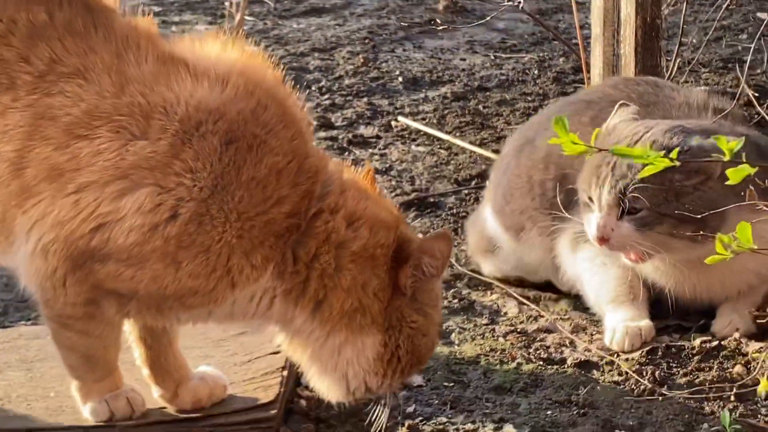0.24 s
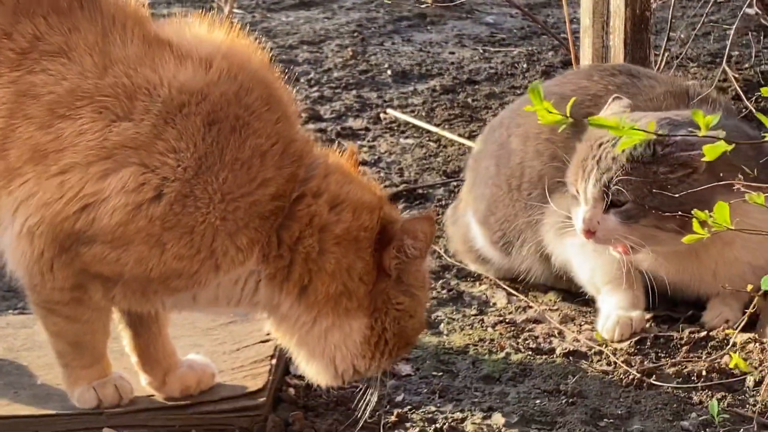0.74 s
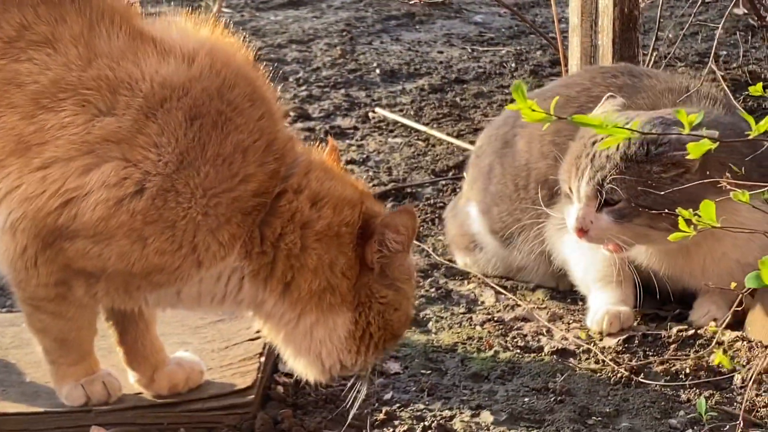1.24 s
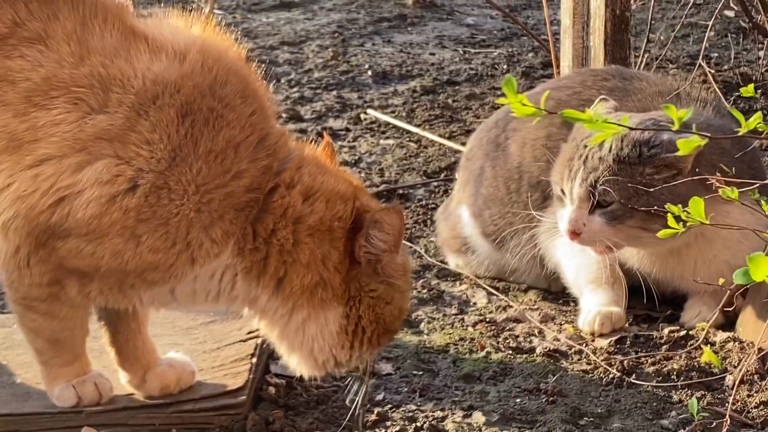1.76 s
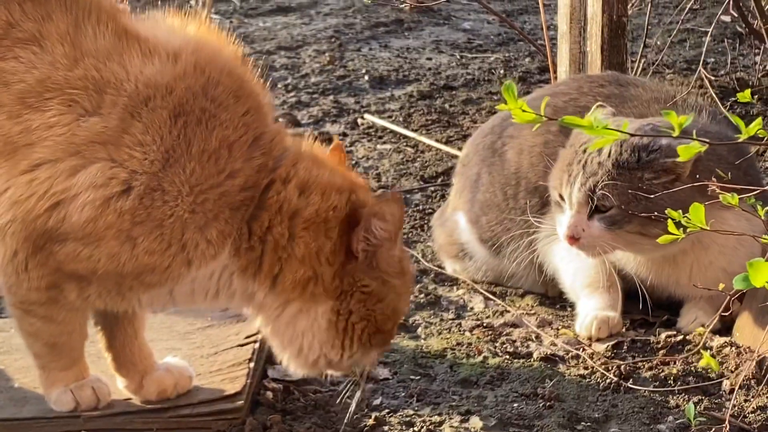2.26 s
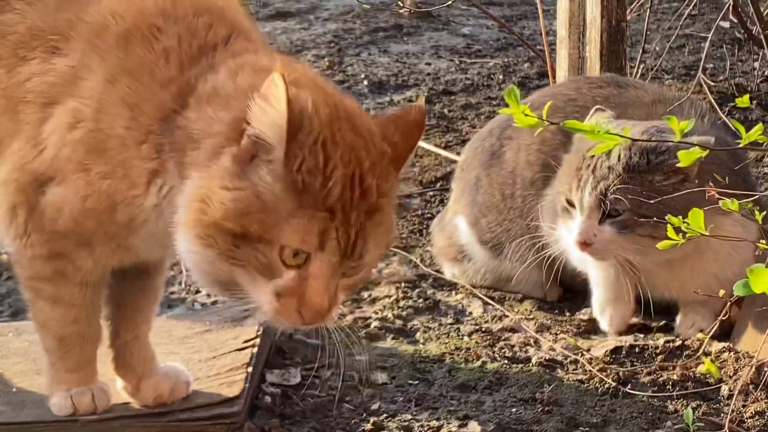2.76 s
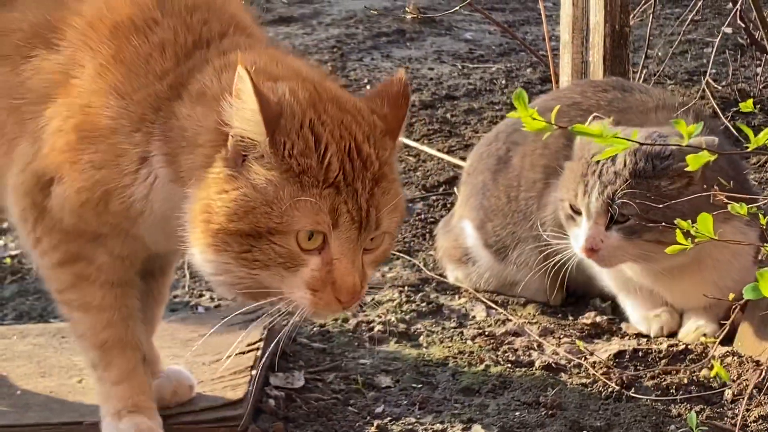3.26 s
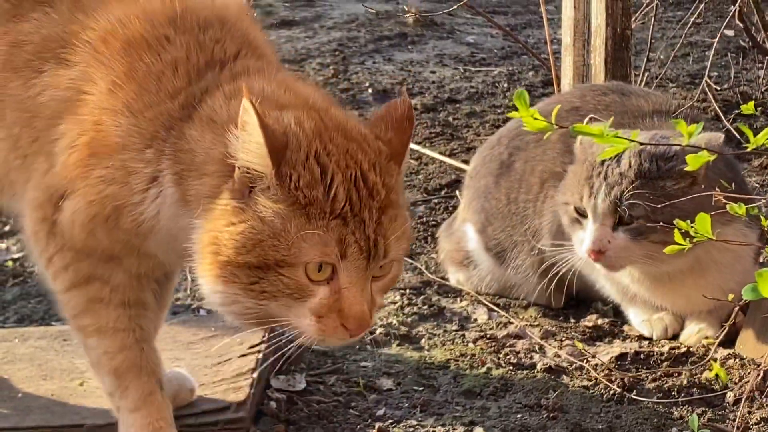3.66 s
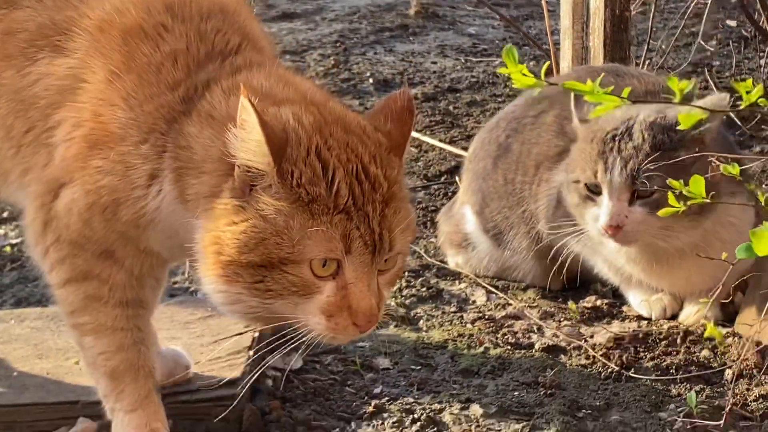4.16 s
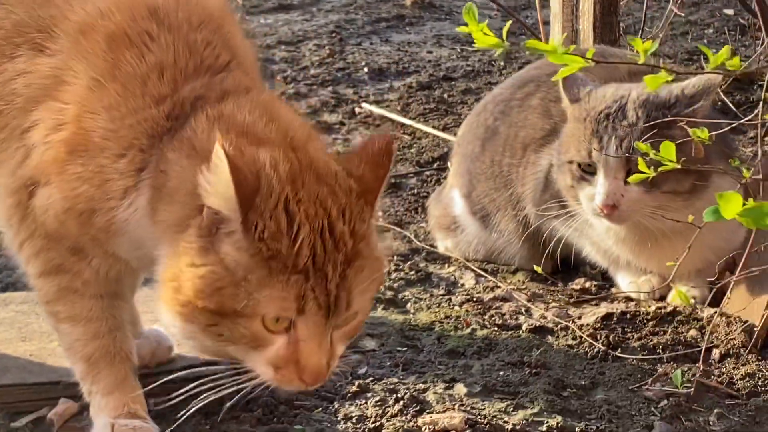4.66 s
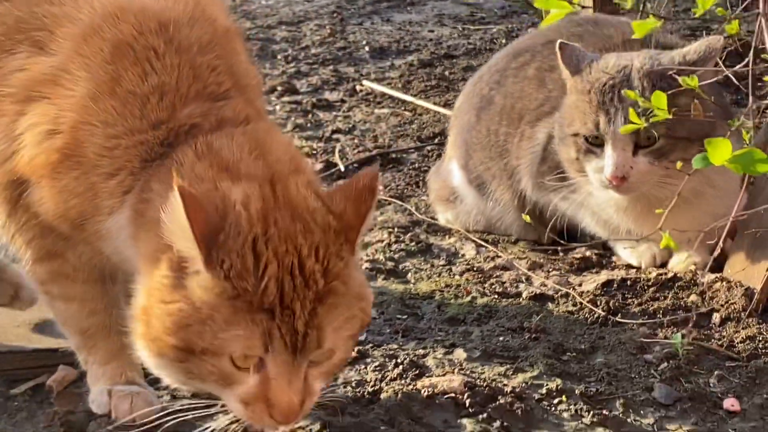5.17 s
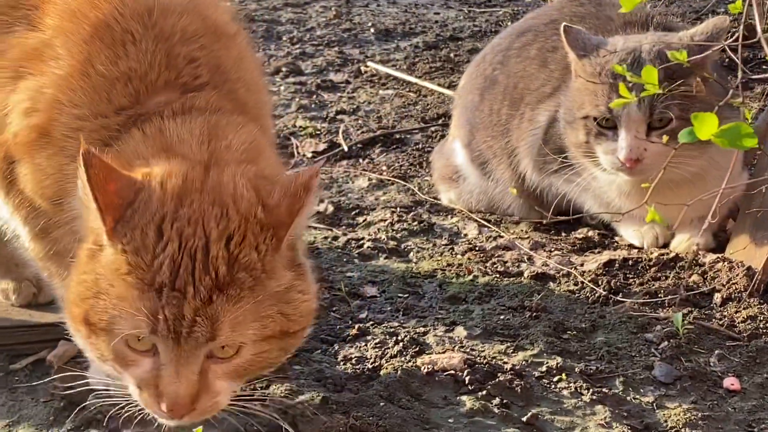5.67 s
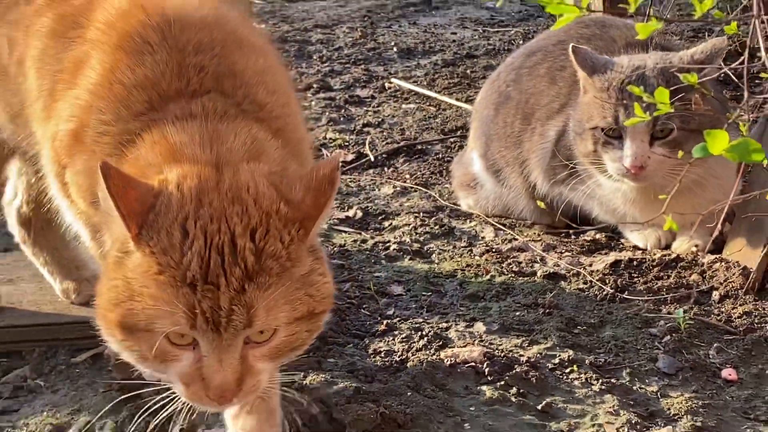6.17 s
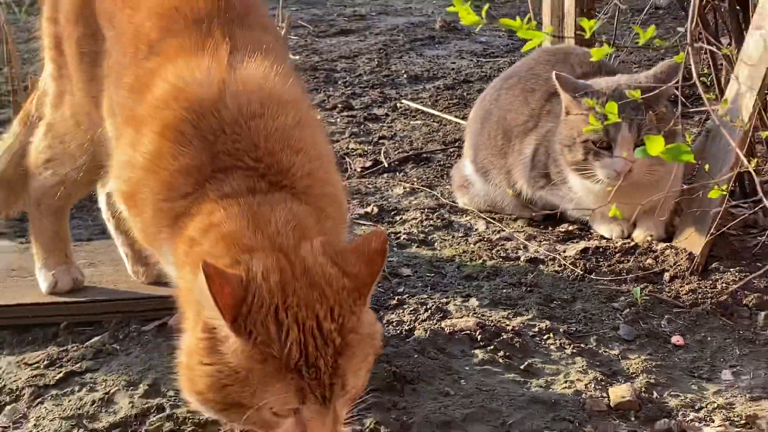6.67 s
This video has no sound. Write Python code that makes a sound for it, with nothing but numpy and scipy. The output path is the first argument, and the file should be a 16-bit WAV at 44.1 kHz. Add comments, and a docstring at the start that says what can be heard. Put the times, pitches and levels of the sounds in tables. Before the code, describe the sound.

Outdoors, a tense, drawn-out cat yowl sinks into a rattling growl, leaving a quiet garden with distant whistling birds and small twig ticks.

```python
"""From the start, filtered noise gives light wind, a murmur and dry leaves, under two faint tones.
A cat yowls close by: harmonics of its vocal folds, raspy with turbulence while the mouth is open, then clean.
The voice cracks near 2 s and slides down two octaves into a growl; far birds, gliding sines, call from 1.2 s.
A soft thump of low noise falls at 2.9 s; as the yowl ends, noise bursts tick like a twig under a paw, and
birds whistle on with long echoes. Last, soft swells of low noise are the cat shifting its weight."""
import sys
import numpy as np
from scipy import signal
from scipy.fft import rfft, irfft, next_fast_len
from scipy.io import wavfile
from scipy.ndimage import map_coordinates

SR = 44100
rng = np.random.default_rng(int(sys.argv[2]) if len(sys.argv) > 2 else 0)


def master_out(mix):
    """Clip the mix to full scale and print it as 16-bit PCM to the path in sys.argv[1]."""
    frames = np.transpose(np.atleast_2d(mix))
    ceiling = np.clip(frames, -1, 1)
    pcm = np.round(ceiling * 32767).astype(np.int16)
    wavfile.write(sys.argv[1], SR, pcm)


N = 304992
TIME = np.arange(N) / SR  # s

# resonances of the throat for the upper partials and the leaking air: (frequency [Hz], level [dB])
THROAT = [(600, 9), (1000, 28.5), (1450, 7.5), (2200, 21), (2500, 0.5), (2650, 3), (2850, -8), (3150, -3),
          (3450, -10.5), (4300, -6), (5600, -1.5), (7000, 1.5), (8000, -3), (9000, -24), (12500, -5.5),
          (15000, -19.5)]
SLACK_DB_PER_OCTAVE = -17.5  # fading of the upper partials as the folds slacken; the rasp floor fades half as fast


def amp(db):
    """A level in decibels is twenty times the logarithm of the gain returned."""
    return 10 ** (np.asarray(db) / 20)


def unit(x):
    """Normalise the mean power to 1, so that a later gain sets the rms level."""
    return x / np.sqrt(np.mean(x ** 2) + 1e-20)


def along(points, hz):
    """Interpolate (frequency, value) points on a logarithmic axis, on which equal steps are equal intervals."""
    point_hz, values = np.transpose(points)
    return np.interp(np.log(hz + 1), np.log(point_hz + 1), values)


def curve(points):
    """Interpolate (time, value) points linearly to one value per sample."""
    return np.interp(TIME, *np.transpose(points))


def bell(x, centre, half_width):
    """Gaussian weighting, falling to 1/e at the half width."""
    return np.exp(-((x - centre) / half_width) ** 2)


def resonance(hz, centre_hz, half_width_hz):
    """Lorentzian peak of height 1, the shape of a damped resonance, falling to 1/2 at the half width."""
    return 1 / (1 + ((hz - centre_hz) / half_width_hz) ** 2)


def swells(rows):
    """Superpose Gaussian gain envelopes given as (time [s], 1/e half length [s], level [dB])."""
    return sum(amp(db) * bell(TIME, s, length) for s, length, db in rows)


def wobble(rate):
    """Band-limited random modulation: a spline through random knots, rate knots a second."""
    knots = rng.standard_normal(int(N * rate / SR) + 4)
    return map_coordinates(knots, [TIME * rate])


def filtered(x, response):
    """Linear filtering: multiply the spectrum by a response of frequency."""
    m = next_fast_len(N + SR // 2)
    return irfft(rfft(x, m) * response(np.fft.rfftfreq(m, 1 / SR)), m)[..., :N]


def shaped(x, spectrum):
    """Colour a signal with a spectrum by linear filtering, then normalise it to rms 1."""
    return unit(filtered(x, lambda hz: amp(along(spectrum, hz))))


def rush(spectrum):
    """A diffuse field as mid and side noise of one colour; rms 1."""
    # width of the field, near mono in the bass: (frequency [Hz], side level relative to mid [dB])
    width = [(60, -20), (200, -12), (500, -3.5), (1500, 0.5), (2200, -10.5), (3500, -19)]

    def mid_side_gain(hz):
        """The coherence of left and right follows from the ratio of side to mid."""
        mid_db = along(spectrum, hz)
        return amp([mid_db, mid_db + along(width, hz)])

    mid, side = filtered(rng.standard_normal((2, N)), mid_side_gain)
    return unit(np.array([mid + side, mid - side]))


def placed(x, left_db):
    """Place a mono source by interaural level difference, louder on the left by left_db."""
    return np.array([x * amp(left_db / 2), x * amp(-left_db / 2)])


def garden(x, t60):
    """Diffuse reverberation from ground, fence and shrubs: exponentially decaying noise, different at each ear."""
    t = np.arange(SR // 2) / SR
    decay = amp(-60 * t / t60) * (t > .004)  # the echoes start after 4 ms
    tail = rng.standard_normal((2, len(t))) * decay
    return signal.fftconvolve(x[None], tail / np.linalg.norm(tail[0]), axes=1)[:, :N]


def yowl():
    """Source and filter: vocal folds and turbulence excite mouth and throat, under one pitch, pressure and jaw."""
    # the yowl sags gently, cracks and slides down: (time [s], pitch before jitter [Hz])
    pitch_points = [(0, 634.7), (.3, 634.8), (.56, 624), (.98, 612.3), (1.17, 599.1), (1.31, 614.6),
                    (1.45, 604.3), (1.54, 607.8), (1.675, 571.7), (1.7, 589), (1.88, 576.3), (1.968, 522.7),
                    (1.988, 566.4), (2.075, 537.9), (2.11, 517), (2.22, 488), (2.355, 382.8),
                    (2.425, 386.2), (2.457, 361.7), (2.49, 295.6), (2.546, 246.7), (2.62, 222.1),
                    (2.735, 180.4), (2.9, 150.7), (3.15, 138), (3.27, 117.2)]
    # effort, which sets the strength of overtones and rasp: (time [s], level [dB])
    press_points = [(0, -1), (.35, 1.5), (.77, 0.5), (.84, -1.5), (1.0, 1.5), (1.17, 1), (1.45, 0.5),
                    (1.62, 2.5), (1.73, -0.5), (1.97, 1), (2.0, -5.5), (2.08, -12), (2.11, -8.5),
                    (2.45, -18.5), (3.2, -20), (3.3, -8)]
    # jaw: (time [s], opening [0-1])
    mouth_points = [(0, 0.95), (.56, 0.94), (.8, 0.78), (1.14, 0.76), (1.3, .25), (1.46, .42), (1.6, 0),
                    (1.9, 0.1)]
    # centre of the throat's high resonance: (time [s], frequency [Hz])
    ring_points = [(0, 5650), (1.0, 5720), (1.45, 5700), (1.62, 6260), (1.85, 6380), (1.94, 5400),
                   (1.99, 4950), (2.11, 4630), (2.3, 4360)]
    # the folds fall out of step for a moment: (time [s], 1/e half length [s], unevenness [dB])
    stumbles = [(2.382, .015, -15), (2.448, .013, -9), (2.91, .025, -9)]
    # air hissing past the teeth once the voice has cracked: (frequency [Hz], level [dB per Hz])
    airflow_spectrum = [(1000, -22.5), (4500, -4), (5600, -7), (6500, -1), (8300, -4), (9500, -20),
                        (13000, -8.5), (15000, -30.5)]
    crack_s, end_s, release_s = 1.982, 3.285, 0.068  # the folds change register at the crack
    slack_hz = 440  # below this pitch the folds slacken
    upper_shut_db, upper_open_db = -57, 3  # upper partials with the mouth shut, and their gain when it opens
    crack_thin_db, airflow_db = -0.5, -75

    steady_pitch, press_db = curve(pitch_points), curve(press_points)
    mouth, ring_hz = np.clip(curve(mouth_points), 0, 1), curve(ring_points)
    cracked = np.clip((TIME - crack_s) / 0.0092, 0, 1)
    slack = np.maximum(np.log2(slack_hz / steady_pitch), 0)  # octaves
    stumble = swells(stumbles)
    pitch = jittered(steady_pitch, mouth, slack, stumble)
    phase = 2 * np.pi * np.cumsum(pitch) / SR
    puffs = rng.standard_normal(N) * (1 + .7 * np.cos(phase))  # air leaves in puffs, one a cycle

    strain = 0.048 + 0.22 * mouth  # a strained voice flutters in strength
    low = low_partials(steady_pitch, phase, press_db, mouth, cracked, slack, strain)
    upper_db = upper_shut_db + upper_open_db * mouth + press_db
    upper_db = upper_db + crack_thin_db * cracked + SLACK_DB_PER_OCTAVE * slack
    upper = upper_partials(pitch, phase, mouth, cracked, ring_hz)
    upper = upper * amp(upper_db + 0.62 * wobble(45) + 0.66 * strain * wobble(260))
    airflow = amp(airflow_db) * cracked * shaped(puffs, airflow_spectrum)

    grip = 1 - 0.83 * bell(TIME, crack_s, .005)  # the folds lose their grip at the crack
    grip = grip * np.clip((end_s - TIME) / release_s, 0, 1)
    grip = grip * amp(3.5 * stumble * wobble(180))
    dark = grip * (np.sqrt(2) * (low[0] + low[1]) + growl(pitch, phase, puffs))
    bright = grip * (np.sqrt(2) * (low[2] + low[3]) + rasp(puffs, press_db, mouth, slack))
    top = grip * (np.sqrt(2) * upper + leak(puffs, pitch, mouth, upper_db) + airflow)
    lean_db = np.interp(pitch, [150, 600], [2.4, 4.3])  # low notes reach both sides more equally
    direct = placed(dark, lean_db) + placed(bright, left_db=1.4) + top
    return direct + amp(-14.5) * garden(dark + bright, t60=0.17)


def jittered(pitch, mouth, slack, stumble):
    """Frequency jitter: irregular fold vibration spreads the pitch, most when slack, open or out of step."""
    least, by_opening, by_slack, by_stumble = 0.0017, 0.0011, 0.005, .05  # shares of the pitch
    jitter = least + by_opening * mouth + by_slack * slack ** 2 + by_stumble * stumble
    return pitch * (1 + jitter * (wobble(70) + 1.1 * wobble(400) + .5 * wobble(20)))


def low_partials(pitch, phase, press_db, mouth, cracked, slack, strain):
    """Harmonic series: partials 1 to 4 are whole multiples of one phase, weighted by chest and mouth."""
    # the fundamental comes through the chest: (pitch [Hz], level [dB])
    fundamental = [(120, -50), (138, -42.5), (160, -35), (200, -35.5), (280, -41), (340, -38.5),
                   (440, -36.5), (550, -44.5), (630, -47.5)]
    # resonances of the mouth wide open, for partials 2 to 4: (frequency [Hz], level [dB])
    open_mouth = [(1000, -36), (1260, -37), (1700, -16), (1900, -13), (2100, -16), (2500, -11.5)]
    # resonances of the mouth nearly shut, likewise: (frequency [Hz], level [dB])
    shut_mouth = [(300, -40), (420, -26.5), (600, -23.5), (780, -24.5), (980, -22.5), (1130, -21.5),
                  (1250, -26.5), (1420, -50.5), (1730, -31.5), (2120, -18), (2500, -23)]
    overtone_db_per_octave, crack_third_db = -18.5, -3.5

    levels_db = [along(fundamental, pitch)]
    for k in range(2, 5):
        mouth_db = mouth * along(open_mouth, k * pitch) + (1 - mouth) * along(shut_mouth, k * pitch)
        levels_db.append(press_db + mouth_db + overtone_db_per_octave * np.log2(k / 2))
    # the new register has a weak third partial, until the folds slacken
    levels_db[2] = levels_db[2] + crack_third_db * cracked * np.clip(1 - slack, 0, 1)
    flutter = wobble(90)
    return [amp(db + 0.08 * k * strain * flutter + 0.51 * wobble(11)) * np.sin(k * phase)
            for k, db in enumerate(levels_db, 1)]


def upper_partials(pitch, phase, mouth, cracked, ring_hz):
    """Formant filtering: resonances of the throat weight each of the partials 5 to 29 as it passes through."""
    shut = np.clip((640 - pitch) / 100, 0, 1)  # the jaw closes as the pitch falls
    half_closed = np.clip((.75 - mouth) / 0.065, 0, 1)

    def throat_db(hz):
        """Resonances add level and absorption removes it, at each frequency."""
        db = along(THROAT, hz)
        # after the crack the high resonance stands out
        db = db + (7.5 + 13 * cracked) * resonance(hz, ring_hz, 220)
        # closing the jaw damps the upper middle
        db = db - 19.5 * shut * bell(hz, 4020, 390)
        # after the crack a second resonance above it, and the very top, stand out too
        db = db + 8.5 * cracked * resonance(hz, 1.58 * ring_hz, 400)
        db = db + 10 * cracked * np.clip((hz - 8000) / 2500, 0, 1)
        # the half-closed mouth swallows a narrow band
        db = db - 20.5 * half_closed * bell(hz, 3110, 150)
        # after the crack the partials between the two high resonances fade
        return db - 6.5 * cracked * bell(hz, 1.22 * ring_hz, 600)

    upper = np.zeros(N)
    for k in range(5, 30):
        partial_db = throat_db(k * pitch) - 0.98 * (k - 5) + 2.8 * wobble(13)  # higher partials are weaker
        # phases scattered by 0.7 rad line up loosely into pulses
        upper += amp(partial_db) * np.sin(k * phase + rng.normal(0, .7))
    return upper


def rasp(puffs, press_db, mouth, slack):
    """Turbulence modulated at the pitch excites the mouth's resonances, and grows as a power of its opening."""
    # two strong mouth resonances, a broad high one and a thin top: (frequency [Hz], level [dB per Hz])
    spectrum = [(500, -35.5), (1050, -22), (1450, -19), (1650, -3.5), (1800, -3), (2060, -13), (2350, -2.5),
                (2680, -7.5), (2920, -23), (3250, -37), (4100, -30), (5700, -19), (7400, -27.5),
                (9300, -56.5), (12500, -37.5), (13800, -61)]
    # the rasp catches again as the jaw closes: (time [s], 1/e half length [s], level [dB])
    catches = [(1.315, .012, -48), (1.375, .01, -53), (1.425, .01, -54), (1.48, .015, -57),
               (1.95, .02, -63)]
    open_db, shut_db, opening_power = -40.5, -71.5, 1.8
    clear_s, clear_length_s, clear_db = 1.2, .05, -6  # the open-mouth rasp weakens as the voice clears
    snarl_db = 3  # over the rest of the rasp
    hiss_from_hz, hiss_db_per_opening = 3500, 15

    cleared = np.clip((TIME - clear_s) / clear_length_s, 0, 1)
    gain = amp(press_db + open_db + clear_db * cleared) * mouth ** opening_power
    gain = gain + swells(catches)
    gain = gain + amp(press_db / 2 + shut_db + SLACK_DB_PER_OCTAVE * slack / 2)
    rough = shaped(puffs, spectrum) + amp(snarl_db) * snarl()
    rough = rough * gain * amp(1.7 * wobble(30) + 2.5 * (1 - mouth) * wobble(70))
    # the open mouth's hiss follows the jaw
    hiss = filtered(rough, lambda hz: hz > hiss_from_hz)
    hiss_db = hiss_db_per_opening * (np.maximum(mouth, .7) - 1.26)
    return rough - hiss + hiss * amp(hiss_db)


def snarl():
    """Quadrature modulation: low-passed noise carried to a narrow resonance below the third partial; rms 1."""
    # the resonance sinks as the jaw closes: (time [s], centre frequency [Hz])
    centre_points = [(0, 1753), (.45, 1754), (.8, 1684), (1.1, 1647), (1.3, 1584), (1.6, 1524)]
    width_hz = 62
    a, b = filtered(rng.standard_normal((2, N)), lambda hz: resonance(hz, 0, width_hz))
    phase = 2 * np.pi * np.cumsum(curve(centre_points)) / SR
    return unit(a * np.cos(phase) + b * np.sin(phase))


def leak(puffs, pitch, mouth, upper_db):
    """Turbulent leakage: even a clean, high voice passes a little noise through the throat."""
    shut_db, open_db = -12, 4.5  # relative to the upper partials with the jaw shut, and gain once it parts
    air = unit(filtered(puffs, lambda hz: amp(along(THROAT, hz)) * (hz > 3500)))
    gain = amp(upper_db + shut_db + open_db * np.minimum(mouth / .25, 1))
    return gain * np.clip((pitch - 520) / 100, 0, 1) * air


def growl(pitch, phase, puffs):
    """Periodic excitation at a low rate: each flap of the slack folds rings the throat and chops the air."""
    # the flapping: (time [s], 1/e half length [s], level [dB])
    growls = [(2.67, .07, -64), (2.82, 0.076, -55.5), (3.08, 0.19, -66.5)]
    # low ring of the throat at each flap: (frequency [Hz], level [dB])
    gullet = [(300, -11.5), (440, 10), (520, -38), (650, 8.5), (760, -20), (900, -16), (1010, -7),
              (1130, -28)]
    # air chopped by the flaps: (time [s], 1/e half length [s], level [dB])
    chopped_air = [(2.92, 0.32, -53.5)]
    # colour of that air: (frequency [Hz], level [dB per Hz])
    chest = [(70, -23.5), (150, -13), (280, 0.5), (480, -1.5), (700, -10), (1000, -25), (2500, -34.5),
             (5000, -49.5), (12000, -66.5)]
    flaps = sum(amp(along(gullet, k * pitch)) * np.sin(k * phase) for k in range(2, 10))
    ringing = swells(growls) * amp(-0.5 * wobble(150)) * flaps
    chopped = puffs * (1 + 0.39 * np.cos(phase))
    return ringing + swells(chopped_air) * shaped(chopped, chest)


def birds():
    """Frequency-modulated pure tones: far whistles with long echoes, a song that steps up, and gliding chirps."""
    # one nearly level whistle repeated: (start [s], length [s], level before a 3 dB cut [dB])
    whistle_notes = [(3.25, .28, -67), (3.81, .24, -65.5), (4.04, .26, -71), (4.26, .24, -67),
                     (4.47, .22, -72), (4.85, .16, -66), (5.125, .29, -59.5), (5.675, .18, -56.5),
                     (5.85, .2, -68), (6.17, .18, -64.5)]
    # a run of notes that step up to a held top: (start [s], top frequency [Hz], level before a 3 dB cut [dB])
    song_notes = [(2.325, 5100, -69), (2.412, 5330, -56), (2.508, 5420, -52), (2.613, 5230, -55),
                  (2.717, 5250, -53)]
    # scattered chirps: (start [s], length [s], start [Hz], end [Hz], level before a 3 dB cut [dB])
    chirp_notes = [(1.23, .03, 3700, 4100, -56), (3.37, .035, 4950, 4750, -65),
                   (3.565, 0.041, 3530, 3940, -66), (4.16, .03, 5060, 6540, -69),
                   (4.27, .024, 5100, 6410, -70), (4.655, 0.045, 3720, 3690, -60),
                   (4.86, .05, 3650, 3710, -61), (5.425, 0.043, 3590, 3717, -61),
                   (5.77, .035, 5800, 5920, -61), (5.78, 0.035, 4700, 5310, -62),
                   (5.875, 0.035, 5800, 5900, -63), (5.88, 0.037, 4730, 5140, -64),
                   (5.915, 0.028, 2960, 3630, -60), (6.015, .04, 2850, 3670, -62),
                   (6.24, .03, 3950, 3600, -62), (6.27, .03, 3350, 3200, -68),
                   (6.455, 0.045, 3710, 3690, -67.5)]
    song_glide, chirp_glide = (.28, .56), (0, .72)  # start and end of the glide, as shares of a note
    warble = wobble(350)

    def sing(notes, glide_span):
        """Each note swells, glides by integrating its frequency into phase, and fades."""
        out = np.zeros(N)
        for s, length, start_hz, end_hz, db in notes:
            start = round(s * SR)
            u = np.linspace(0, 1, int(length * SR))
            glide = np.sin(np.pi / 2 * np.interp(u, glide_span, [0, 1])) ** 2
            # wide glides warble more
            unsteady = glide + .11 * (1.5 - glide) * warble[start:][:len(u)]
            hz = start_hz + (end_hz - start_hz) * unsteady
            tone = np.sin(2 * np.pi * np.cumsum(hz) / SR)
            out[start:][:len(u)] += amp(db) * np.sin(np.pi * u) ** .7 * tone
        return out * amp(-3 + 2.2 * wobble(60))

    whistles = sing([(s, length, 4100, 4156, db) for s, length, db in whistle_notes], chirp_glide)
    song = sing([(s, .062, 4330, top_hz, db) for s, top_hz, db in song_notes], song_glide)
    chirps = song + sing(chirp_notes, chirp_glide)
    echoes = amp(-5) * garden(whistles, t60=1.8)
    echoes = echoes + .55 * garden(chirps, t60=.15) + amp(-6) * garden(song, t60=1)
    return whistles + chirps + echoes[0]


def twigs():
    """Impulsive fracture under a paw: a noise burst and a heavily damped mode, stronger in a thicker twig."""
    # ticks: (start [s], snap level before a 6 dB lift [dB], body level before a 6 dB cut, relative to snap [dB])
    ticks = [(3.299, -49, -26), (3.357, -54, -24), (5.968, -36.5, -9)]
    # colour of the tick: (frequency [Hz], level [dB])
    twig = [(100, 0), (550, 0), (1100, -4), (1500, -8), (3000, -11), (5800, -11), (9000, -26), (12000, -24),
            (15000, -42)]
    out, t = np.zeros(N), np.arange(SR // 10) / SR
    for s, db, body_db in ticks:
        snap = rng.standard_normal(len(t)) * amp(-60 * t / .009)  # falls 60 dB in 9 ms
        body = np.sin(2 * np.pi * 560 * t) * amp(body_db - 6 - 60 * t / .02)
        out[round(s * SR):][:len(t)] += amp(db + 6) * (snap + body)
    return filtered(out, lambda hz: amp(along(twig, hz)))


def steps():
    """Soft contact: padded paws spread the impact in time, giving dull swells without a sharp attack."""
    # the cat shifts its weight: (time [s], 1/e half length [s], level [dB])
    shifts = [(5.31, 0.052, -50), (5.464, 0.081, -46), (5.703, 0.26, -54), (6.196, 0.19, -55),
              (6.51, 0.21, -50.5)]
    # colour of a paw on the ground: (frequency [Hz], level [dB per Hz])
    pad = [(60, -37), (110, -0.5), (145, -1), (220, -22.5), (420, -19), (900, -49), (2500, -71)]
    return swells(shifts) * rush(pad)


def rumble():
    """Low-frequency noise under Gaussian envelopes: wind turbulence at the microphone, and one soft thump."""
    # gusts, and at 2.92 s a soft low thump: (time [s], 1/e half length [s], level [dB])
    gusts_and_thump = [(.07, 0.12, -41.5), (.79, 0.082, -41.5), (2.92, .025, -45.5), (3.73, .025, -52),
                       (3.98, 0.031, -47.5), (4.145, .015, -46)]
    # colour of the rumble: (frequency [Hz], level [dB per Hz])
    spectrum = [(13, -37.5), (22, -2.5), (35, -5.5), (54, 8.5), (71, 6.5), (97, 1), (130, -11.5),
                (170, -44), (290, -120)]
    breeze_db = -50.5
    calm_db = -2.5 * bell(TIME, 1.5, .45)  # the wind drops for a while
    gain = amp(breeze_db + calm_db) + swells(gusts_and_thump)
    return gain * amp(1.4 * wobble(9.2) + 1.3 * wobble(1.7)) * rush(spectrum)


def murmur():
    """Diffuse low-passed noise: the dull sound of the surroundings, with little treble."""
    # colour of the surroundings: (frequency [Hz], level [dB per Hz])
    distance = [(70, -29), (130, 1), (200, -1.5), (350, -7.5), (600, -15), (1000, -23.5), (2000, -45.5),
                (5000, -56)]
    return amp(-57 + 1.8 * wobble(7.6)) * rush(distance)


def leaves():
    """Random amplitude modulation of broad noise makes the faint, crackly rustle of dry leaves."""
    # dry leaves stir: (time [s], 1/e half length [s], level [dB])
    stirs = [(3.41, 0.029, -71), (3.72, 0.038, -71.5), (4.02, 0.043, -74.5), (4.35, 0.13, -83),
             (4.8, 0.19, -78), (5.15, 0.1, -72), (5.65, 0.038, -77), (5.93, 0.039, -78),
             (6.19, 0.024, -74.5), (6.31, 0.032, -86), (6.44, 0.029, -77.5), (6.72, 0.035, -70)]
    # the hiss dips briefly: (time [s], 1/e half length [s], change [dB])
    lulls = [(3.572, 0.11, -4.5), (3.89, 0.089, -3.5), (4.699, 0.054, -2), (5.503, 0.05, -0.5),
             (6.09, 0.034, -2.5), (6.58, 0.072, -3)]
    # colour of the rustle: (frequency [Hz], level [dB per Hz])
    rustle = [(400, -15.5), (1100, 2), (2500, -0.5), (4000, -3.5), (6000, -10), (8200, -12.5),
              (9300, -23.5), (10700, -1.5), (12200, -5), (13300, -31.5), (15500, -26.5)]
    lull_db = sum(db * bell(TIME, s, length) for s, length, db in lulls)
    crackle = amp(lull_db + 1.5 * wobble(25) + 1.6 * wobble(300))
    return (amp(-71) + swells(stirs)) * crackle * rush(rustle)


def hum():
    """Pure tones with slow random amplitude and phase modulation: faint and wavering, from the neighbourhood."""
    # tones: (frequency [Hz], level [dB])
    tones = [(500, -69.5), (802, -76)]
    return sum(amp(db + 2 * wobble(5.4)) * np.sin(2 * np.pi * hz * TIME + .5 * wobble(12)) for hz, db in tones)


def scene():
    """Linear superposition of the cat close by and the garden around it."""
    return yowl() + birds() + twigs() + steps() + rumble() + murmur() + leaves() + hum()


def record(dry):
    """Port resonance: two microphone ports colour and phase-shift the treble, below a sharp band limit."""
    # resonant gain of both ports: (frequency [Hz], level [dB])
    port_gain = [(7900, 0), (9100, 9.5), (10000, 4.5), (11000, -3), (12000, 1.5), (12600, 7), (13400, 9.5),
                 (14200, 4.5), (15000, -6)]
    # lead of the left port over the right: (frequency [Hz], phase [rad])
    port_phase = [(6800, 0), (8100, 2), (9100, 1.5), (10200, 2), (11200, 1.32), (12200, 1.6), (13400, 2.5),
                  (14400, 2.5)]
    top_hz = 15600

    def ports(hz):
        """Each port turns the phase by half the lead, in opposite senses."""
        turn = np.exp(np.array([[.5j], [-.5j]]) * along(port_phase, hz))
        return amp(along(port_gain, hz)) * turn * (hz < top_hz)

    return filtered(dry, ports)


dry = scene()
out = record(dry)
master_out(out)
```